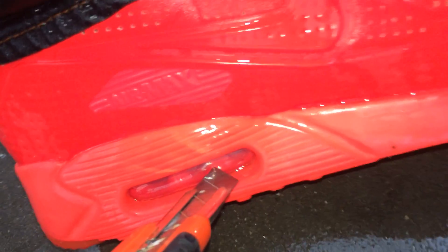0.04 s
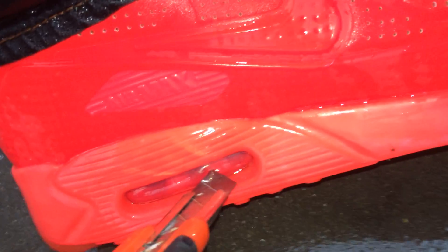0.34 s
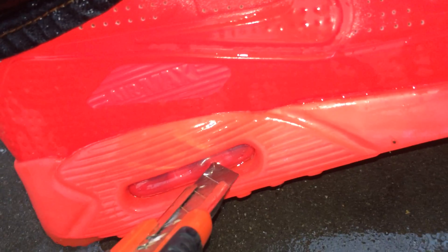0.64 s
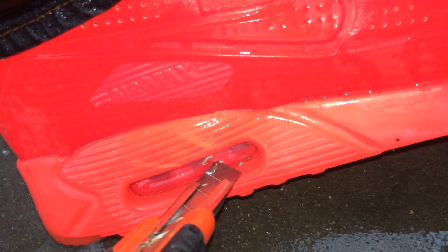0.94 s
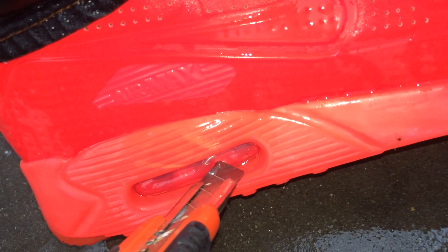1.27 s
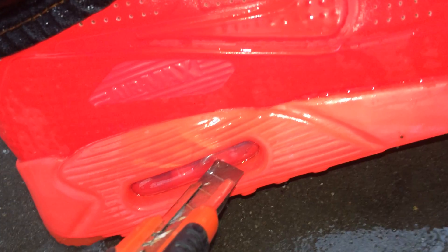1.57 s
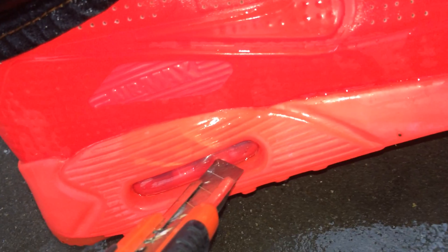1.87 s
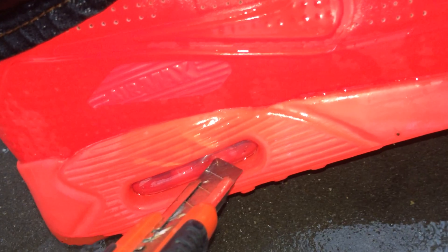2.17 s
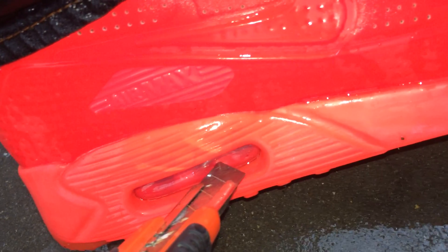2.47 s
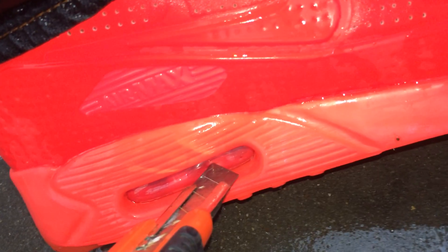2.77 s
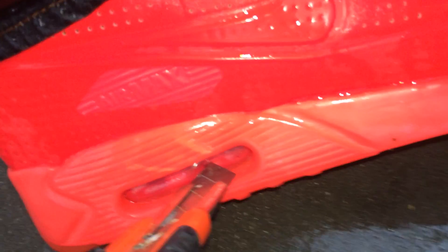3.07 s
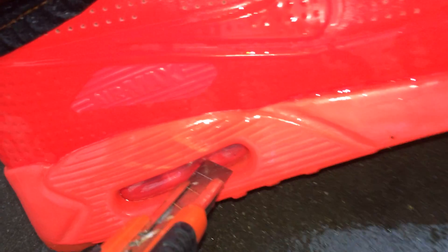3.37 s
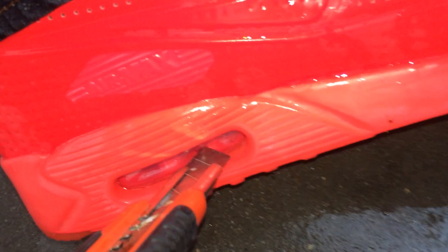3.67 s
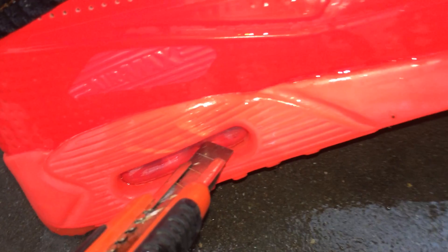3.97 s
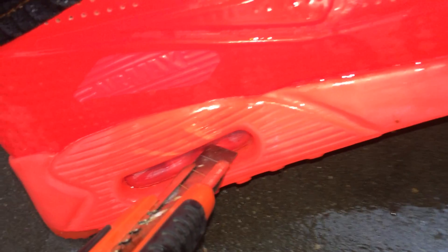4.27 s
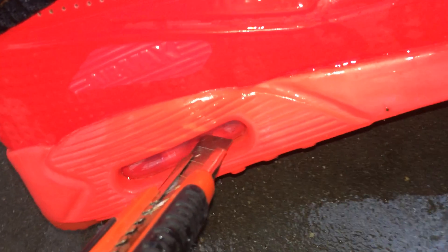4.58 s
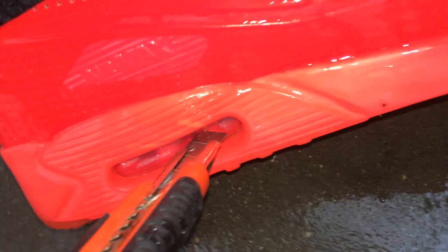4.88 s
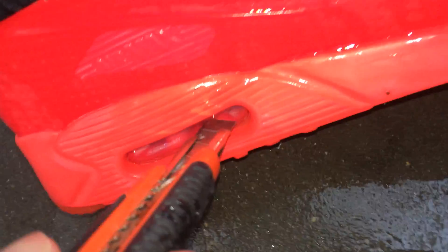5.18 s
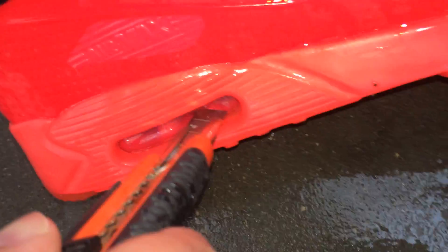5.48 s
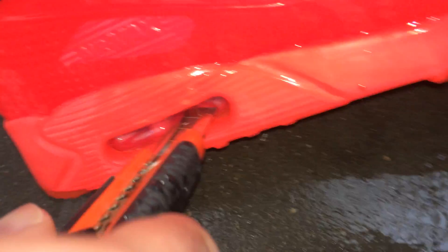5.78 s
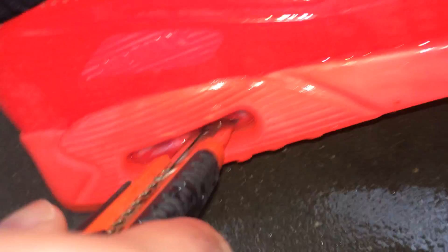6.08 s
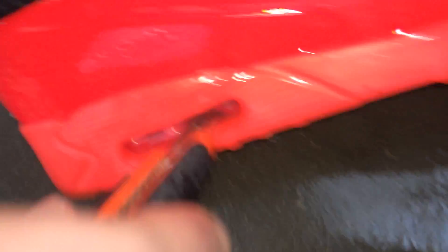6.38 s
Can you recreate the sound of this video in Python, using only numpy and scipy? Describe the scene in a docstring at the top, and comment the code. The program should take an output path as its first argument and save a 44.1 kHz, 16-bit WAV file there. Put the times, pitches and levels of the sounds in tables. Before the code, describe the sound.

A faint, low outdoor rumble runs throughout, with light wind on the microphone and a distant wash like traffic. For the first three seconds there is little else. From about 3.3 seconds, a box cutter pressed into the air pad of a wet sneaker gives small, close, irregular ticks of steel on plastic. A clearer tick comes at 4.4 seconds, and sharp clicks at 5.0 and 5.9, with very faint scraping of the blade between them. At about 6.15 seconds the pad tears in a quick cluster of snaps over a dull thump, and air rushes out in a bright hiss. This is by far the loudest moment, lasting about a quarter of a second and dulling as it dies. At 6.4 seconds the water film spits with a small pop, followed by a couple of light ticks over the rumble.

```python
"""A low outdoor rumble, then sparse close ticks, a crackling puff and a short hiss: a box cutter
is pushed into the air pad of a wet sneaker. The blade ticks in its holder as the load grows and rubs
on the wet skin, which then tears in a few snaps that jolt the sole. Turbulent air hisses out of the
slit for a quarter of a second, and the water film spits as the flow stops."""
import sys
import numpy as np
from scipy import signal
from scipy.fft import rfft, irfft
from scipy.io import wavfile

SR = 44100
rng = np.random.default_rng(int(sys.argv[2]) if len(sys.argv) > 2 else 0)


def generate_wav(sig):
    """Save sig (samples, or channels by samples) to the path in sys.argv[1] as 16-bit PCM at SR."""
    pcm = np.round(np.clip(np.atleast_2d(sig).T, -1, 1) * 32767).astype(np.int16)
    wavfile.write(sys.argv[1], SR, pcm)


N = 292383
TIME = np.arange(N) / SR
SHORT = np.arange(4096) / SR  # time axis of one tick, snap or pop
FREQS = np.fft.rfftfreq(N, 1 / SR)
OPEN_S, HOLD_S, EMPTY_S = 6.1565, 0.15, 0.13  # the slit opens; the pad holds its pressure, then runs out


def amp(db):
    """Decibels to gain."""
    return 10 ** (np.asarray(db) / 20)


def unit_rms(x):
    """Scales to rms 1."""
    return x / np.sqrt(np.mean(x ** 2) + 1e-20)


def burst(x):
    """Scales a short sound to the energy of 4 ms at rms 1."""
    return x / np.sqrt(np.sum(x ** 2) / (.004 * SR) + 1e-20)


def at_hz(points, hz):
    """Reads a curve on a log-frequency axis."""
    freqs, values = np.transpose(points)
    return np.interp(np.log(hz + 1), np.log(freqs), values)


def curve(rows, column=1):
    """One column of a time table at every sample."""
    rows = np.asarray(rows)
    return np.interp(TIME, rows[:, 0], rows[:, column])


def swell(s, length):
    """A smooth rise and fall around a time, peak 1."""
    return np.cos(np.pi * np.clip((TIME - s) / length, -.5, .5)) ** 2


def add(mix, s, sound):
    """Mixes a sound in at a time."""
    part = mix[round(s * SR):][:len(sound)]
    part += sound[:len(part)]


def noise(colour):
    """Steady noise of a given colour, rms 1."""
    return unit_rms(irfft(rfft(rng.standard_normal(N)) * amp(at_hz(colour, FREQS)), N))


def wander(rate_hz):
    """Random drift up to about rate_hz, rms 1."""
    return unit_rms(irfft(rfft(rng.standard_normal(N)) * np.exp(-(FREQS / rate_hz) ** 2), N))


def cut(x, hz, kind, order=2):
    """Low- or high-pass filter."""
    return signal.sosfilt(signal.butter(order, min(hz, .47 * SR), kind, fs=SR, output="sos"), x)


def shelf(x, hz, treble_db):
    """Rides the treble above hz along a curve."""
    low = signal.sosfiltfilt(signal.butter(2, hz, fs=SR, output="sos"), x)
    return low + (x - low) * amp(treble_db)


def resonate(x, hz, width_hz):
    """A resonance of gain 1 that follows the curve hz."""
    carrier = np.exp(2j * np.pi * np.cumsum(hz) / SR)
    pole = np.exp(-np.pi * width_hz / SR)
    return 2 * (carrier * signal.lfilter([1 - pole], [1, -pole], x / carrier)).real


def ring(modes, size=1):
    """Damped modes struck at once, with alternating sign; a larger size rings lower."""
    return sum((-1) ** k * amp(db - 60 * SHORT / t60) * np.sin(2 * np.pi * hz / size * SHORT)
               for k, (hz, db, t60) in enumerate(modes))


def scatter(t60):
    """A dying spray of tiny contacts and near reflections, with an even spectrum."""
    fade = amp(-60 * SHORT / t60)
    spectrum = rfft(rng.standard_normal(len(SHORT)) * fade)
    whitened = irfft(spectrum / (abs(spectrum) + 1e-12))
    return burst(whitened * np.sqrt(fade))


def wind(breeze_db=-72):
    """A breeze and a few gusts buffet the microphone."""
    # deep buffeting (frequency [Hz], level [dB])
    colour = [(18, -33), (30, -8.5), (48, 4), (70, -6), (110, -37.5), (250, -74)]
    # gusts (middle [s], length [s], level [dB])
    gusts = [(.6, 2, -63.5), (1.72, 0.62, -63), (2.46, .9, -60), (4.28, 0.25, -64)]
    return noise(colour) * (amp(breeze_db) + sum(amp(db) * swell(s, length) for s, length, db in gusts))


def rumble(level_db=-60, lump_db=3, bump_db=-49.5):
    """A lumpy low rumble with one dull bump."""
    # low outdoor bed (frequency [Hz], level [dB])
    colour = [(25, -26), (50, -9.5), (75, 0.5), (110, 3), (135, -1), (180, -11.5), (300, -39), (600, -56.5)]
    bump = amp(bump_db) * swell(s=2.05, length=0.11)
    return noise(colour) * (amp(level_db + lump_db * wander(7.3)) + bump)


def drone(waver_db=1):
    """A narrow low drone swells and wavers."""
    # the drone's band (frequency [Hz], level [dB])
    colour = [(90, -52), (130, -1), (170, 2), (200, -6.5), (240, -16.5), (290, -24.5), (500, -52.5)]
    # its swells (time [s], level [dB])
    levels = [(0, -61.5), (.85, -58), (2.2, -61.5), (2.35, -53), (3.4, -62), (4.1, -59), (5.1, -54),
              (6.1, -50.5), (6.63, -55)]
    return noise(colour) * amp(curve(levels) + waver_db * wander(4.6))


def far_wash(treble_hz=1300):
    """A distant wash like traffic, drifting in level and brightness."""
    # the wash's tone (frequency [Hz], level [dB])
    colour = [(100, 3), (280, 7), (450, 0.5), (600, 0), (800, -3), (1100, -1.5), (1700, -7), (2400, -14),
              (4000, -21), (9000, -32.5)]
    # its drift (time [s], level [dB], treble gain [dB])
    drift = [(0, -65.5, -0.5), (.5, -71.5, 2.5), (1.1, -70, 1.5), (1.5, -69, 2.5), (2.55, -69, -1),
             (3.1, -70.5, -1.4), (4.6, -69.5, -.5), (5.2, -71.5, 2), (6.63, -70, -2.5)]
    return shelf(noise(colour), treble_hz, curve(drift, column=2)) * amp(curve(drift))


def faint_hiss(level_db=-80):
    """A steady hiss under everything."""
    # nearly white noise floor (frequency [Hz], level [dB])
    colour = [(500, 2.5), (3000, -0.5), (7000, 0), (12000, -4), (15000, -6.5)]
    return amp(level_db) * noise(colour)


def yard_echo(x, wet_db=-27, build_s=0.006):
    """A faint tail from walls a few metres off; its treble dies first."""
    # the yard's decay (frequency [Hz], t60 [s])
    decay = [(200, 1), (1500, 0.81), (6000, 0.66), (14000, 0.3)]
    hz, t, spectra = signal.stft(rng.standard_normal(SR), SR, nperseg=256)
    envelope = amp(-60 * t / at_hz(decay, hz)[:, None]) * (1 - np.exp(-t / build_s))
    tail = signal.istft(spectra * envelope, SR, nperseg=256)[1]
    return amp(wet_db) * signal.fftconvolve(x, tail / np.linalg.norm(tail))[:N]


def blade_rubs(grain_db=3):
    """Faint grainy scraping as the edge slides on the wet skin."""
    # strokes (start [s], length [s], level [dB])
    strokes = [(4.134, 0.14, -76.5), (4.998, 0.047, -70), (5.70, 0.18, -75.5), (5.87, 0.1, -70)]
    # the scrape's tone (frequency [Hz], level [dB])
    colour = [(500, -16), (1500, 2), (4000, -3), (8000, -1), (12000, 0), (15000, -5)]
    envelope = np.zeros(N)
    for s, length, db in strokes:
        add(envelope, s, amp(db) * np.hanning(int(length * SR)))
    return envelope * noise(colour) * amp(grain_db * wander(300))


def tick(low_hz, high_hz, ring_hz, rattle_s, crack_db=-3, ring_t60=0.0034, echo=0.61, trip_s=0.000825):
    """A quick rattle of steel on plastic; where the blade sits picks the band and the strongest ring."""
    # the cutter's modes (frequency [Hz], level [dB], t60 [s])
    modes = [(1090, 1.5, 0.0036), (2200, -2, 0.0084), (2910, -4.5, 0.013), (4050, 0, 0.0058),
             (5320, -6, 0.005), (7200, 5.5, 0.0038), (8300, -6, 0.011), (9550, -5.5, 0.01),
             (10530, 0, 0.005), (12170, 10, 0.002), (15000, 0, 0.0094)]
    body = burst(signal.fftconvolve(scatter(t60=6 * rattle_s), ring(modes))[:len(SHORT)])
    crack = scatter(t60=0.016)
    crack = crack + echo * np.interp(SHORT - trip_s, SHORT, crack, left=0)  # back from the handle's end
    rattle = cut(body + amp(crack_db) * crack, low_hz, "high", order=5)
    rattle = burst(cut(rattle, high_hz, "low"))
    tone = burst(ring([(ring_hz, 0, ring_t60)]) * (1 - np.exp(-SHORT / rattle_s)))
    tone_db = 1 - 2.5 * abs(np.log2(ring_hz / 2160))  # the handle rings best at 2160 Hz
    return burst(rattle + amp(tone_db) * tone)


def blade_creep(from_s=1.7, slips_per_s=2, level_db=-75.5, spread_db=2.5):
    """Faint slips at random moments once the blade bears on the pad."""
    slips = (rng.random(N) < slips_per_s / SR) * (TIME > from_s)
    gains = amp(level_db + spread_db * rng.standard_normal(N))
    click = tick(low_hz=2500, high_hz=10000, ring_hz=4140, rattle_s=.0012)
    return signal.fftconvolve(slips * gains, click)[:N]


def blade_ticks():
    """The loaded blade slips in its holder with clear ticks."""
    # slips (time [s], level [dB], low cut [Hz], high cut [Hz], ring [Hz], rattle time constant [s])
    slips = [(2.440, -67, 2000, 3500, 2740, 0.0022), (3.2696, -61.5, 1500, 12000, 7150, .0025),
             (3.741, -59, 940, 11000, 7130, 0.0022), (3.773, -57.5, 600, 9100, 1060, 0.0055),
             (4.0735, -60.5, 990, 9900, 2600, 0.0021), (4.2355, -55.5, 700, 9400, 7320, .00023),
             (4.4115, -44, 1350, 6260, 2060, 0.00067), (4.765, -66.5, 1500, 4000, 2550, .0016),
             (5.0137, -37.5, 3030, 12500, 8270, 0.00079), (5.4403, -52, 2230, 10900, 2430, 0.0024),
             (5.621, -65.5, 1100, 14000, 1400, .0006), (5.718, -63, 1497, 15000, 3800, .0022),
             (5.8883, -36.5, 890, 13500, 11500, 0.004), (5.965, -63, 1010, 5000, 1280, .001),
             (6.036, -67, 2350, 8900, 3900, .005), (6.116, -65.5, 1200, 5000, 2000, .0024),
             (6.431, -48, 2000, 12000, 4360, .00067), (6.5143, -50, 1510, 12300, 490, 0.00084),
             (6.58, -69, 5040, 15100, 12600, .001)]
    out = np.zeros(N)
    for s, db, *seat in slips:
        add(out, s, amp(db) * tick(*seat))
    return out


def wet_pops(rise_s=0.00018, top_hz=4700):
    """A water film bursts at the blade and rings briefly."""
    # pops (time [s], level [dB], size [factor on the period])
    pops = [(4.8875, -55, 0.92), (6.4214, -33.5, 0.89), (6.4528, -45.5, 0.75)]
    # the film's modes (frequency [Hz], level [dB], t60 [s])
    modes = [(565, -4.5, 0.0091), (1140, 5, 0.012), (1500, 5.5, 0.0068), (2030, -1.5, 0.017),
             (3150, 7.5, 0.0035), (4000, -2.5, 0.0053)]
    out = np.zeros(N)
    for s, db, size in pops:
        pop = ring(modes, size) * (1 - np.exp(-SHORT / rise_s))
        add(out, s, amp(db) * burst(cut(pop, top_hz, "low", order=6)))
    return out


def snap(high_hz, spray_db=-3, spray_t60=0.0067):
    """One sharp snap of tearing skin with its short spray."""
    # the tear's tone (frequency [Hz], level [dB])
    colour = [(100, -3), (450, 4.5), (900, -4), (3500, -2.5), (5000, -4), (7000, -4), (11500, 6.5),
              (15000, -17)]
    hz = abs(np.fft.fftfreq(len(SHORT), 1 / SR))
    log_gain = np.log(amp(at_hz(colour, hz)))
    pulse = np.fft.ifft(np.exp(np.conj(signal.hilbert(log_gain)))).real  # minimum phase: a hard attack
    spray = signal.fftconvolve(pulse, scatter(spray_t60))[:len(SHORT)]
    return burst(cut(amp(spray_db) * burst(spray) - burst(pulse), high_hz, "low"))


def puncture(lurch_rise_s=0.00077, lurch_t60=0.027):
    """The pad's skin gives in jerks, each a snap over a dull lurch of the sole."""
    # jerks (time [s], snap level [dB], snap high cut [Hz], lurch level [dB], lurch pitch [Hz])
    jerks = [(6.151, -37, 4500, -32, 305), (6.1582, -48, 12000, -19, 153), (6.1618, -36, 7000, -28, 202),
             (6.1720, -24.5, 11000, -24.5, 528), (6.1982, -35, 4000, -36, 300)]
    out = np.zeros(N)
    for s, snap_db, high_hz, lurch_db, lurch_hz in jerks:
        lurch = ring([(lurch_hz, lurch_db, lurch_t60)]) * (1 - np.exp(-SHORT / lurch_rise_s))
        add(out, s, amp(snap_db) * snap(high_hz) - cut(lurch, 55, "high"))
    return out


def rip(start_s=6.1735, length_s=.0115, count=5, softest_db=-31, range_db=4):
    """A run of thin snaps as the slit widens."""
    out = np.zeros(N)
    for k, (late, strength) in enumerate(rng.random((count, 2))):
        thin_snap = cut(snap(high_hz=10500), 700, "high")
        add(out, start_s + length_s * (k + late) / count, amp(softest_db + range_db * strength) * thin_snap)
    return out


def air_flow(nick_s=6.1505, nick_db=-35.5, full_db=-25, rise_s=.0025, seep_db=-60, seep_t60=.14):
    """Flow in dB: a leak as the tip breaks through, full flow, a run-down, a last seep."""
    nicked, opened = (np.clip((TIME - s) / rise_s, 0, 1) for s in (nick_s, OPEN_S))
    left_s = OPEN_S + HOLD_S + EMPTY_S - TIME
    slit = np.maximum(amp(nick_db) * nicked, amp(full_db) * opened)
    run_down = np.clip(left_s / EMPTY_S, 0, 1) ** 1.47
    seep = opened * amp(seep_db + 60 * np.minimum(left_s, 0) / seep_t60)
    return 20 * np.log10(slit * run_down + seep + 1e-9)


def air_jet(flutter_db=0.58, dulling=0.28, dull_below_db=-28, treble_hz=4500, climb_hz_per_s=6000):
    """Turbulent air at the slit, coloured by the recess around it; it dulls as the pressure falls."""
    # the jet's tone (frequency [Hz], level [dB])
    colour = [(200, -48), (450, -24), (650, -16), (850, -7), (1500, -4.5), (2200, -7), (3300, -7),
              (4600, -12), (5400, -1.5), (7300, -1), (8500, -5.5), (9400, 1.5), (11400, 2), (13000, -3.5),
              (14600, -7), (15400, -1)]
    # resonances and hollows of the recess (frequency [Hz], width [Hz], gain [dB])
    recess = [(1314, 110, 5), (1640, 195, 2.5), (2790, 75, 4.5), (4900, 450, -1), (7680, 360, -3.5),
              (11300, 380, -0.5), (12400, 430, -6)]
    recess_db = sum(db / (1 + (2 * (FREQS - hz) / width) ** 2) for hz, width, db in recess)
    air = unit_rms(irfft(rfft(noise(colour)) * amp(recess_db), N))
    notch_hz = 13250 + climb_hz_per_s * np.clip(TIME - OPEN_S - HOLD_S, 0, EMPTY_S)
    air = air - resonate(air, notch_hz, width_hz=650)  # a hollow climbs as the pad empties
    flow_db = air_flow()
    air = shelf(air, treble_hz, dulling * np.minimum(flow_db - dull_below_db, 0))
    return air * amp(flow_db + flutter_db * wander(151))


def scene():
    """Blade and sneaker up close, with their echo, over the outdoor bed."""
    close = blade_ticks() + blade_creep() + blade_rubs() + wet_pops() + puncture() + rip() + air_jet()
    echo = yard_echo(close)
    background = wind() + rumble() + drone() + far_wash() + faint_hiss()
    return (close + echo + background)[None]


def record(dry, top_hz=15350):
    """A steep low-pass takes off the very top."""
    return signal.oaconvolve(dry, signal.firwin(511, top_hz, window=("kaiser", 9), fs=SR)[None], "same")


dry = scene()
out = record(dry)
generate_wav(out)
```